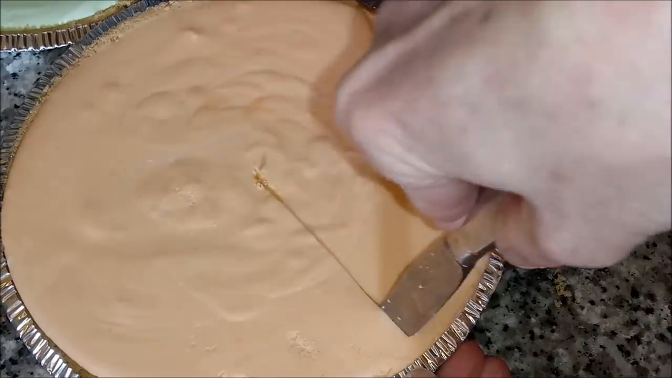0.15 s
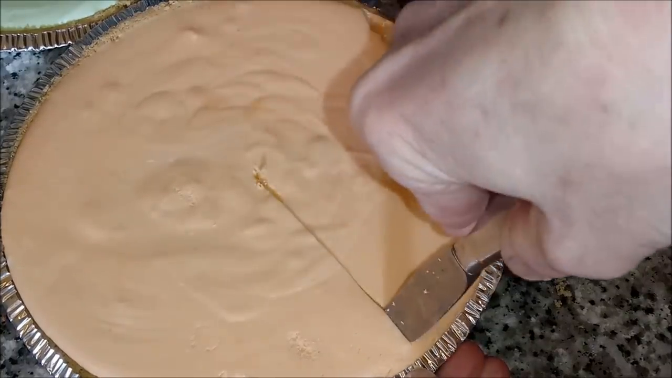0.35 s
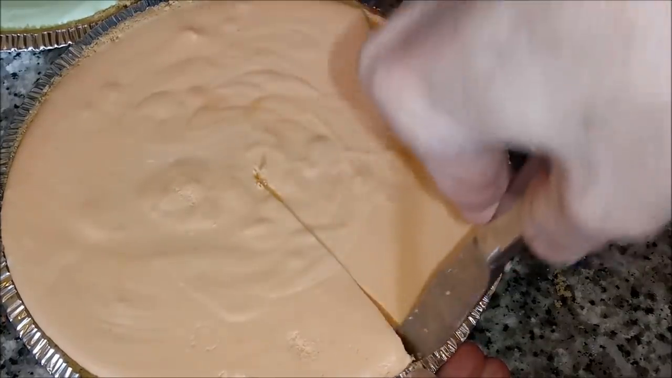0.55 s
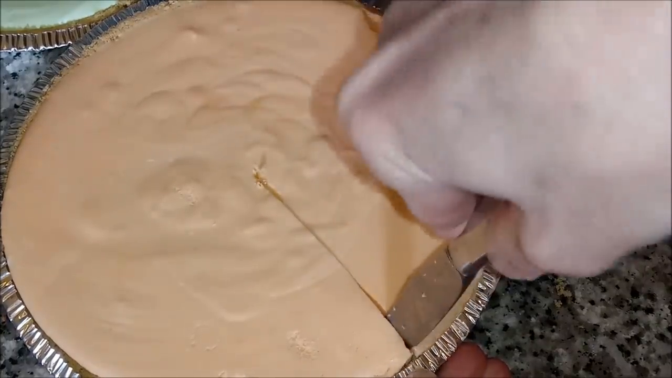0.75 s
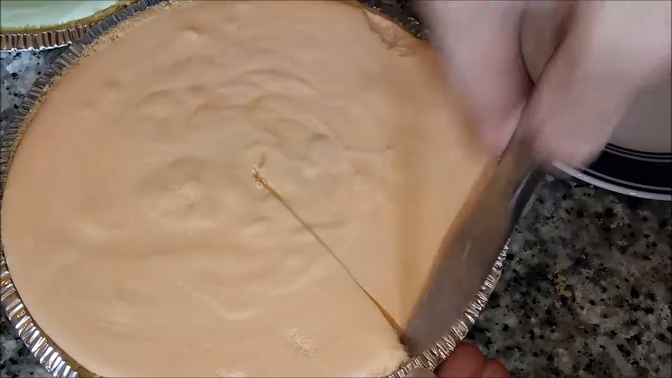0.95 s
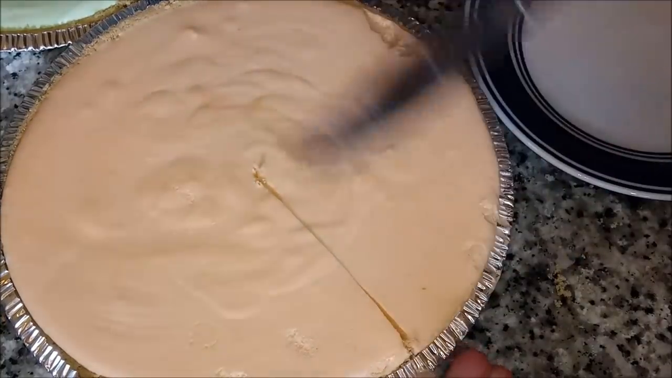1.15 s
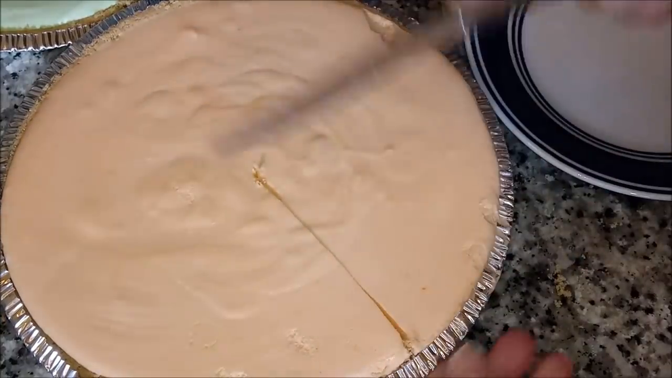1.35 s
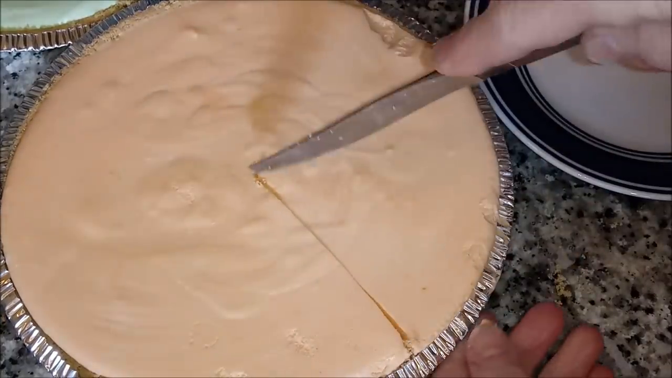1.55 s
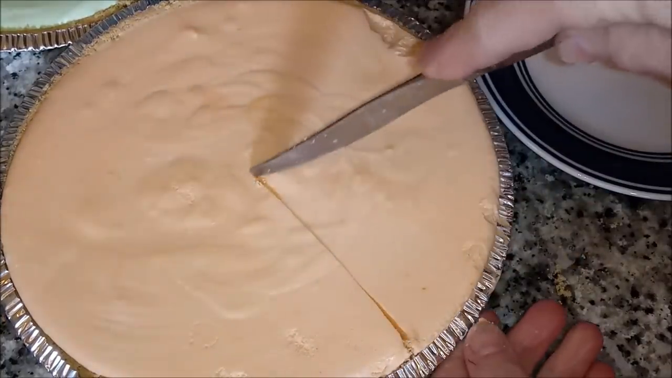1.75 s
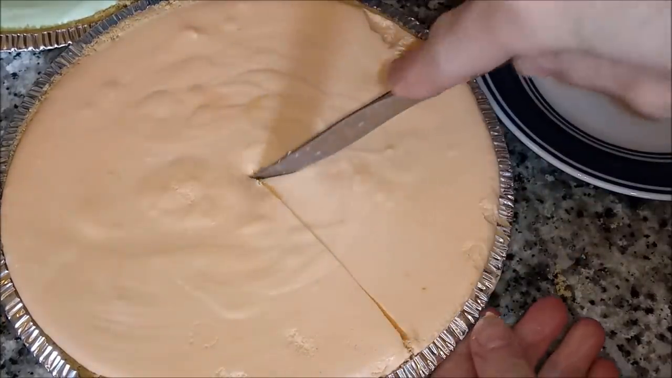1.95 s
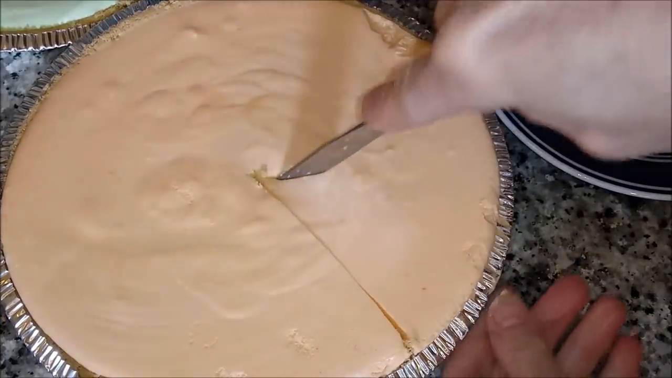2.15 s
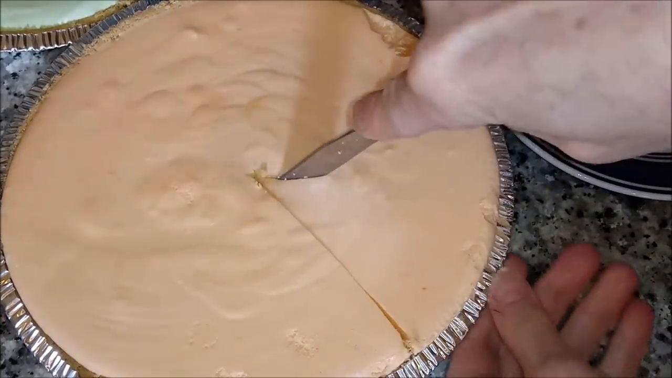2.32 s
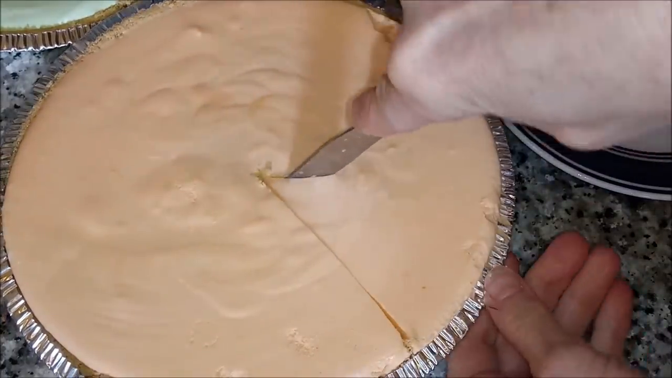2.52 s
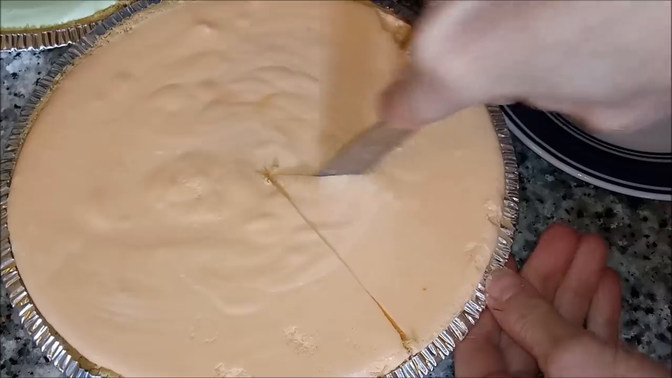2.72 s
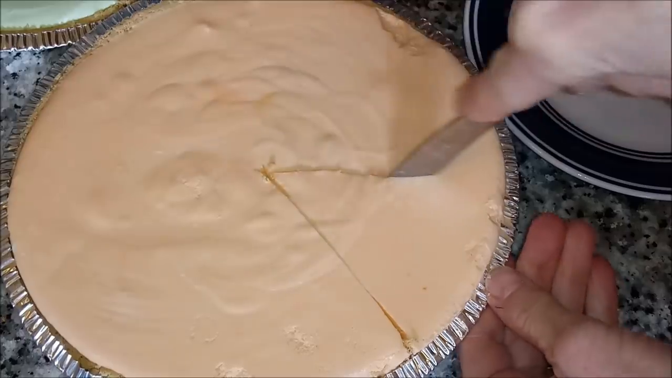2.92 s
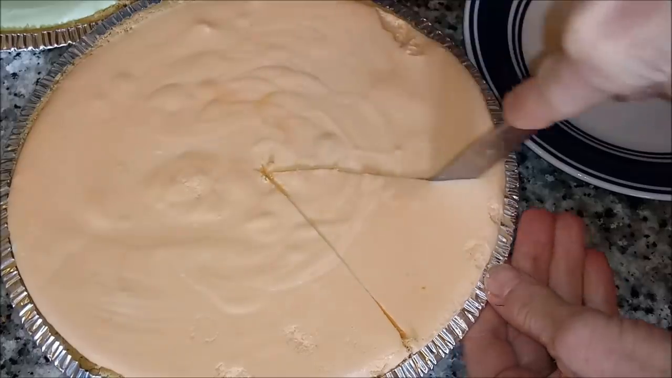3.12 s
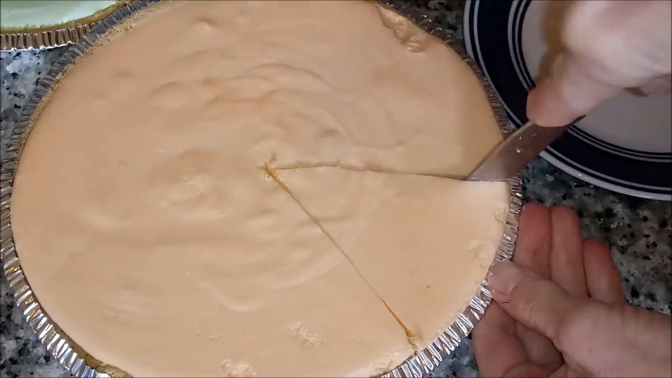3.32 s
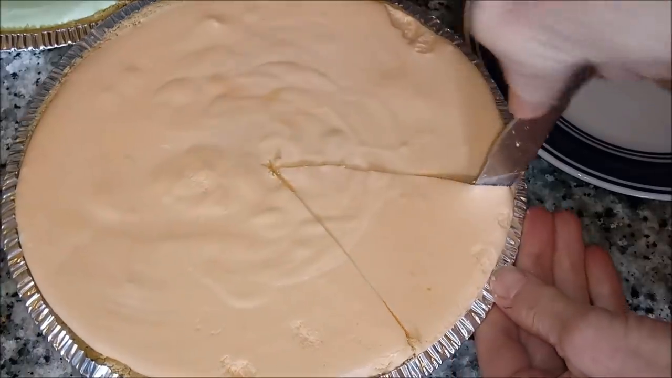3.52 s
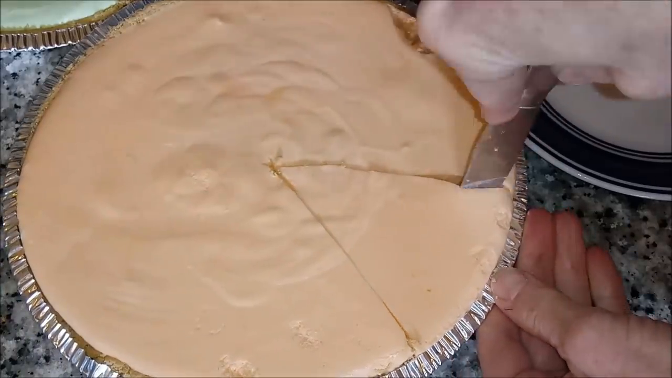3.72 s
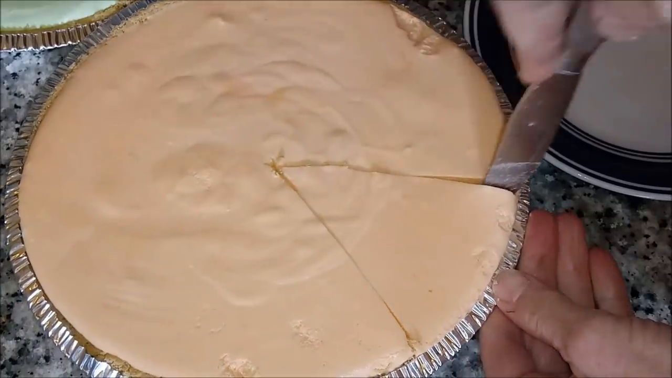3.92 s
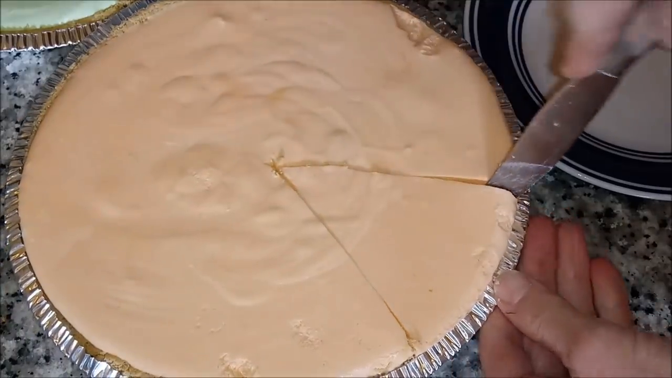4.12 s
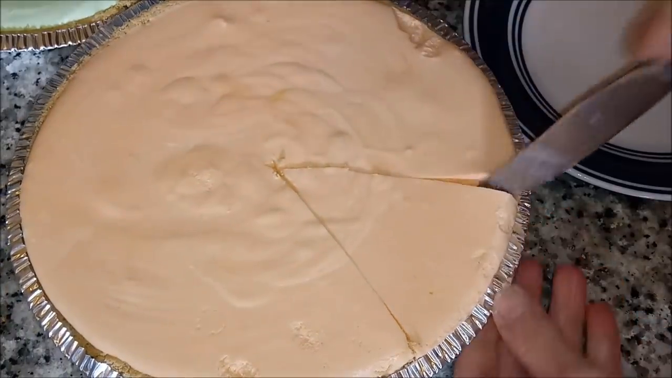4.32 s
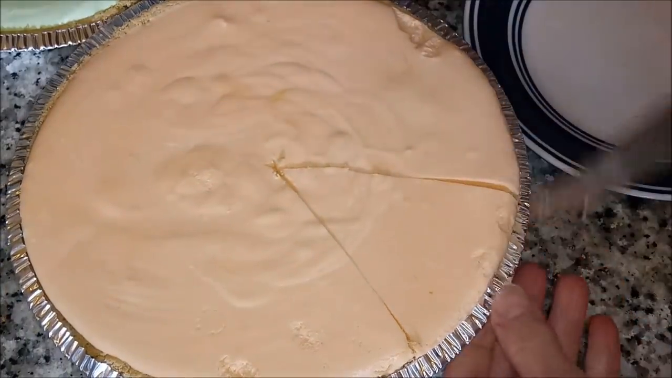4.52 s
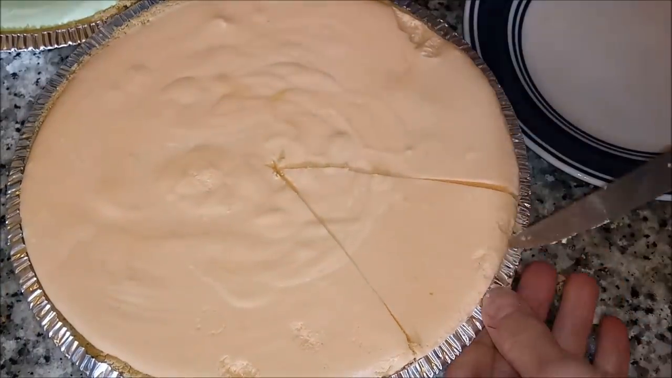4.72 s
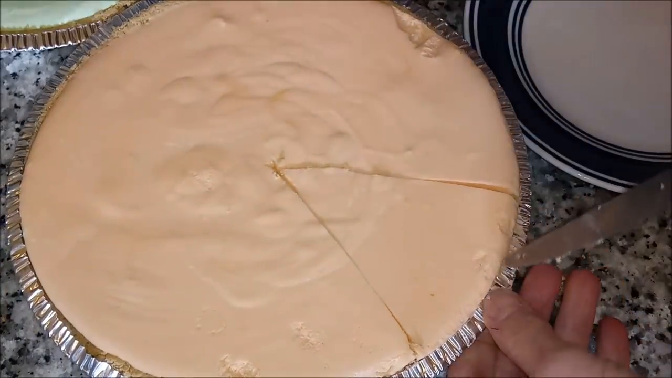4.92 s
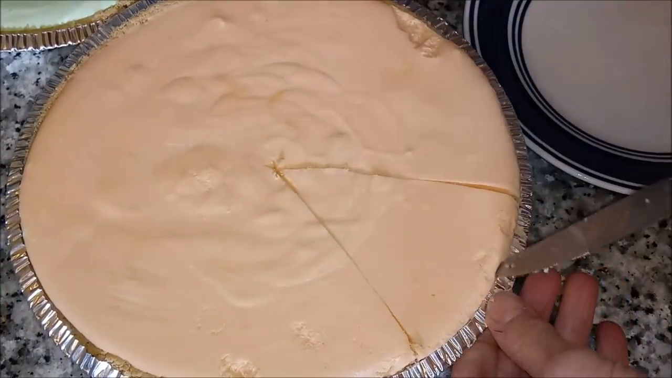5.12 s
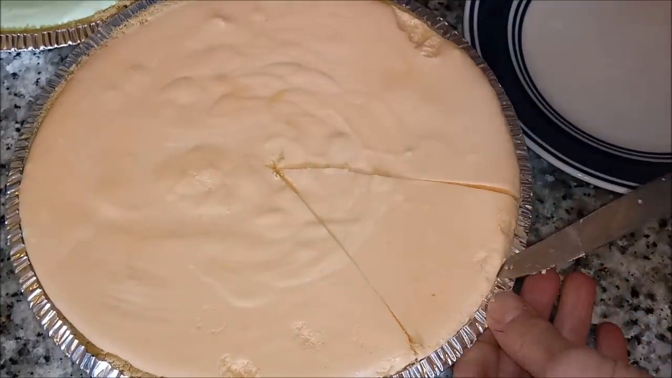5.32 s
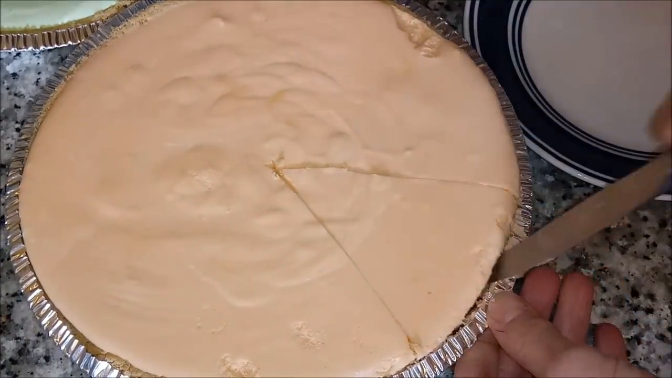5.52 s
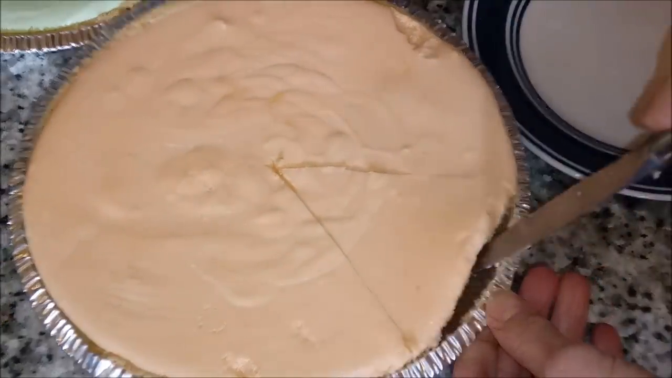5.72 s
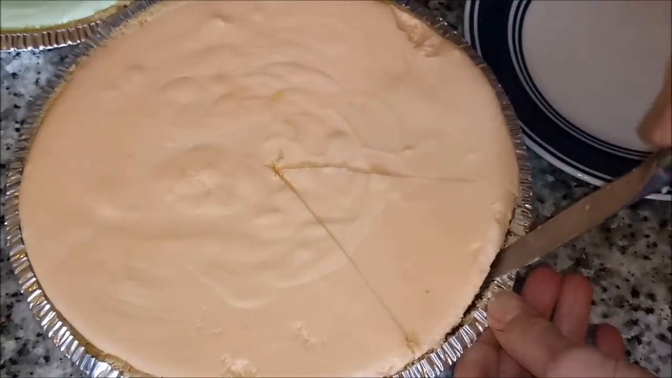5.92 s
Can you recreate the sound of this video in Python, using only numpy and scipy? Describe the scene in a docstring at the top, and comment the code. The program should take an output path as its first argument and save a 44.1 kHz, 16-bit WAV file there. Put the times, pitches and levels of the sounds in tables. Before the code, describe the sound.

Close to the microphone in a small kitchen, a table knife grinds through crumb crust in a foil tin. Foil pops build to one loud snap, then the blade zips over the crimped rim with a quick metallic rattle and short ring. After a quiet pause come gritty scrapes, small crunches and more pops, ending with brighter cracks as the slice is loosened. A faint high chirp repeats over steady low noise and hiss.

```python
"""Kitchen counter: a table knife cuts a cream pie in a foil tin, close to the microphone.
Crumb fractures drive blade and tin as the crust is ground; flexing foil panels pop.
The blade knocks over the pleats of the crimped rim as it is pulled out, then rings; rubs are narrow-band noise.
A hand steadies the tin with soft bumps of low noise; a faint high chirp of swept noise repeats in the room.
Dense reflections and a steady background noise surround it all."""
import sys
import numpy as np
from scipy import signal
from scipy.fft import rfft, irfft
from scipy.io import wavfile

SR = 44100
rng = np.random.default_rng(int(sys.argv[2]) if len(sys.argv) > 2 else 0)


def transcribe(u):
    """Save the signal u as a 16-bit wav file named by the first command-line argument.

    u: samples, shape (n,) or (channels, n), limited to [-1, 1]; the rate is SR.
    q: integer samples, one column per channel.
    """
    v = np.clip(np.atleast_2d(u).T, -1, 1)
    q = np.round(v * 32767).astype(np.int16)
    wavfile.write(sys.argv[1], SR, q)


N = 267113
TIME = np.arange(N) / SR


def gain_of(db):
    """Decibels to amplitude."""
    return 10 ** (np.asarray(db) / 20)


def evened(x):
    """Scales to rms 1."""
    return x / np.sqrt(np.mean(x ** 2) + 1e-20)


def read(points, hz):
    """Reads a table on a log-frequency axis."""
    f, value = np.transpose(points)
    return np.interp(np.log(hz + 1), np.log(f + 1), value)


def add(mix, s, sound):
    """Mixes a sound in at time s."""
    part = mix[max(0, round(s * SR)):][:len(sound)]
    part += sound[:len(part)]


def click(spectrum, size=2048):
    """Minimum-phase click: the tightest causal pulse with this spectrum."""
    hz = abs(np.fft.fftfreq(size, 1 / SR))
    log_gain = np.log(gain_of(read(spectrum, hz)))
    minimum_phase = np.exp(np.conj(signal.hilbert(log_gain)))
    return np.fft.ifft(minimum_phase).real[:size // 2]


def coloured(x, spectrum):
    """Filters x by a spectrum, at rms 1."""
    return evened(signal.oaconvolve(x, click(spectrum))[:len(x)])


def whistle(hz, width_hz):
    """Noise in a narrow resonance that follows the curve hz, at rms 1."""
    r = np.exp(-np.pi * width_hz / SR)
    noise = rng.standard_normal(len(hz)) + 1j * rng.standard_normal(len(hz))
    wander = signal.lfilter([1], np.poly([r, r]), noise)
    carrier = np.exp(2j * np.pi * np.cumsum(hz) / SR)
    return evened((wander * carrier).real)


def modes(table):
    """Ring of a struck object: damped sines."""
    t = TIME[:SR // 2]
    return sum(gain_of(db - 60 * t / t60) * np.sin(2 * np.pi * hz * t) for hz, db, t60 in table)


def through(x, table):
    """x makes an object ring; rms 1."""
    return evened(signal.oaconvolve(x, modes(table))[:N])


# short pushes of the blade: start t/s, length/s, scrape level/dB, swell over the push/dB,
# weight (dull crunch re scrape)/dB, edge (foil hiss re scrape)/dB
PUSHES = [(0.0, 0.046, -74, -4, 4.5, -0.5), (0.084, 0.087, -59.5, 2.5, -3.5, -4),
          (0.304, 0.31, -76.5, 2, -21, 2.5), (0.536, 0.27, -56.5, 6, -12, -1.5),
          (0.861, .08, -65.5, -0.5, -4.5, -12), (0.946, 0.11, -61, 17, -25, -1),
          (1.347, 0.42, -67.5, -10.5, -16, -7.5), (1.99, .26, -81, 7.5, -9, -2),
          (3.764, 0.084, -61, -10.5, 6, -6), (3.874, 0.067, -61.5, 6, -8, -1.5),
          (3.983, 0.29, -71, 2, 1, 1.5), (4.343, 0.41, -65, -10.5, -11, -3.5),
          (4.733, 0.27, -75.5, 10, -10.5, -3.5), (5.065, 0.17, -73, 14.5, -5.5, -4),
          (5.267, 0.23, -58.5, -15.5, -3.5, -1.5), (5.495, 0.266, -62.5, -3, -4.5, 3),
          (5.792, .27, -46.5, -18, -3.5, -4.5)]
# long cut, centre to rim: t/s, scrape level/dB, weight re scrape/dB, edge re scrape/dB
LONG_CUT = [(2.28, -59.5, -6, -7), (2.298, -56.5, -9, -9), (2.368, -64, -6.5, -7.5), (2.852, -59, -9, -2.5),
            (2.992, -66.5, 1, -2), (3.316, -57, -4.5, -6.5), (3.382, -62.5, -3.5, -3.5),
            (3.516, -58.5, -6.5, -4.5), (3.68, -82, -3, 14)]
# pieces of crust giving way: t/s, scrape level/dB, weight re scrape/dB, edge re scrape/dB
CRACKS = [(0.147, -49.5, -3.5, -2.5), (1.385, -56, -41, -7.5), (2.334, -55, -4, -12), (2.45, -57, -4, -3.5),
          (2.518, -54, -4.5, -9), (3.2, -58.5, -5, -1), (3.252, -65, 9, -6), (3.31, -61, -6, 5),
          (3.505, -54, -6, -8), (3.753, -54, -12, -1), (4.207, -51.5, -5, -5), (5.292, -56.5, -7, -5),
          (5.61, -39.5, -12, -5), (5.655, -60.5, 4, 9), (5.795, -61, -1, -4), (5.82, -52, 6.5, 2.5)]
BITE_DB_PER_S, EASE_DB_PER_S = 754, 235  # scrape onset and decay
CRACK_RISE_DB_PER_S, CRACK_FALL_DB_PER_S = 495, 474


def effort():
    """Amplitudes of scrape, crunch, hiss: pushes, long cut and cracks swell and die; powers add."""
    t = TIME[::32]

    def power(start, end, db, weight_db, edge_db, rise=BITE_DB_PER_S, fall=EASE_DB_PER_S):
        """Holds from start to end, with straight dB slopes on either side."""
        db = db - rise * np.maximum(start - t, 0) - fall * np.maximum(t - end, 0)
        return gain_of([db, db + weight_db, db + edge_db]) ** 2

    s, *columns = np.transpose(LONG_CUT)
    total = power(s[0], s[-1], *(np.interp(t, s, c) for c in columns))
    for start, length, db, swell_db, weight_db, edge_db in PUSHES:
        swelling_db = db + swell_db * np.clip((t - start) / length, 0, 1)
        total += power(start, start + length, swelling_db, weight_db, edge_db)
    for at, *levels in CRACKS:
        total += power(at, at, *levels, CRACK_RISE_DB_PER_S, CRACK_FALL_DB_PER_S)
    return [np.interp(TIME, t, part) for part in np.sqrt(total)]


def crumbs(per_s, spread_db, smooth):
    """Tiny fractures of uneven size over smooth friction noise."""
    size = gain_of(spread_db * np.minimum(rng.exponential(1, N), 4))
    breaks = size * rng.choice([-1, 1], N) * (rng.random(N) < per_s / SR)
    return evened(evened(breaks) + smooth * rng.standard_normal(N))


def squelches(per_s, cycles, spread_db, count=18):
    """Tiny air pockets in the moist filling burst, each a short tone of slightly rising pitch."""
    out = np.zeros(N)
    for hz in np.geomspace(850, 2300, count):
        u = TIME[:int(4 * cycles / hz * SR)] * hz / cycles
        size = gain_of(spread_db * np.minimum(rng.exponential(1, N), 3))
        bursts = size * (rng.random(N) < per_s / count / SR)
        bubble = u * np.exp(-2 * u) * np.sin(2 * np.pi * cycles * u * (1 + 0.036 * u))
        out += signal.oaconvolve(bursts, bubble)[:N]
    return evened(out)


def flutter(depth_db, slowest_hz, fastest_hz):
    """The blade catches and gives way at random: a wavering gain."""
    t = TIME[::64]
    rates_hz = np.geomspace(slowest_hz, fastest_hz, 24)
    waver = sum(np.sin(2 * np.pi * (hz * t + rng.random())) for hz in rates_hz)
    return gain_of(depth_db * np.interp(TIME, t, evened(waver)))


# filters for the stroke's three parts: f/Hz, level/dB
SCRAPE_SPECTRUM = [(400, -31.5), (700, -33.5), (1000, -1), (1300, -0.5), (1750, 6.5), (2300, 0),
                   (2800, -3.5), (3600, -3), (5000, -45.5)]
CRUNCH_SPECTRUM = [(40, -19.5), (100, -2.5), (200, -16), (400, 2), (650, 1), (900, 14), (1200, 0),
                   (2000, -42.5)]
HISS_SPECTRUM = [(600, -18), (2200, -6), (3000, 2), (4000, 0), (5500, 3), (6500, 2), (7200, -10.5),
                 (8200, -24.5), (11000, -30), (15000, -43.5)]
# steel blade modes, also rung by rim(): f/Hz, level/dB, t60/s
BLADE = [(1447, 6.5, 0.53), (1545, 0.5, 0.33), (1900, -1, .25), (1911, -17.5, 0.45), (1985, -6, .2),
         (2520, -7, .2), (3400, 4.5, .13), (4690, -19.5, .15), (5870, -11.5, .16), (6630, -0.5, .2)]
# resonances of the filled tin on the counter: f/Hz, level/dB, t60/s
TIN = [(103, 2.5, 0.32), (280.4, -4, 0.45), (372.6, -5, 0.84), (480, -2.5, 0.2), (690, -4.5, 0.39),
       (785.4, 6.5, 0.045), (954, -9, 0.018), (1308, 9, 0.43)]


def cutting():
    """Crumb fractures drive blade and tin; pressure adds dull crunch, the edge on bare foil hiss."""
    scraping, weight, edge = effort()
    fine = crumbs(per_s=1000, spread_db=3.5, smooth=.5)
    coarse = crumbs(per_s=70, spread_db=1.5, smooth=0)
    grit = evened(fine + .45 * coarse)
    scrape = coloured(grit, SCRAPE_SPECTRUM)
    moist = squelches(per_s=160, cycles=9, spread_db=3.5)
    scrape = evened(scrape + gain_of(-12.5) * through(scrape, BLADE) + .5 * moist)
    crunch = coloured(crumbs(per_s=300, spread_db=-1.0, smooth=0.27), CRUNCH_SPECTRUM)
    crunch = evened(crunch + gain_of(-1.5) * through(crunch, TIN))
    hiss = coloured(grit + crumbs(per_s=2400, spread_db=-2.0, smooth=1.0), HISS_SPECTRUM)
    body = gain_of(0.9) * scraping * scrape + gain_of(0.4) * weight * crunch
    catch = flutter(depth_db=1.2, slowest_hz=12, fastest_hz=70)
    return catch * (body + edge * hiss)


HAND_DB, HAND_DELAY_S, HAND_SWAY_S, HAND_SWAY_HZ = -10, .003, .0005, .4  # mean delay, its sway and rate


def under_hand(x):
    """One close reflection from the moving hand combs the sound with slowly shifting ripples."""
    delay_s = HAND_DELAY_S + HAND_SWAY_S * np.sin(2 * np.pi * HAND_SWAY_HZ * TIME)
    echo = gain_of(HAND_DB)
    return (x + echo * np.interp(TIME - delay_s, TIME, x)) / np.hypot(1, echo)


# steady background noise with a faint high hiss: f/Hz, level/dB
BACKGROUND_SPECTRUM = [(25, -13), (60, -6), (100, 0.5), (200, -3.5), (500, -6.5), (1000, -12.5), (1600, 1),
                       (3000, -9.5), (5500, -2.5), (7000, -16), (8200, -25.5), (13500, -23), (15200, -13),
                       (15800, -24), (16100, -23)]


def background():
    """Steady background noise: white noise through one fixed filter."""
    return gain_of(-73.5) * coloured(rng.standard_normal(N), BACKGROUND_SPECTRUM)


CHIRP_FIRST_S, CHIRP_CYCLE_S, CHIRP_SECOND_S = .021, .5514, .295  # two per cycle, unevenly spaced
CHIRP_DB, CHIRP_LENGTH_S = -59.5, .036


def chirps():
    """Short, fuzzy rising noise sweeps with a quick start, in a steady limping rhythm."""
    out, u = np.zeros(N), np.linspace(0, 1, int(CHIRP_LENGTH_S * SR))
    shape = np.sin(np.pi * u ** .65) ** 2
    for cycle in np.arange(CHIRP_FIRST_S, N / SR, CHIRP_CYCLE_S):
        for s in (cycle, cycle + CHIRP_SECOND_S):
            tone = whistle(4800 + 750 * u, width_hz=550)
            add(out, s, gain_of(CHIRP_DB) * shape * tone)
    return out


# stick-slip rubs of blade on crust and foil; the two narrowest rows (1.359 s, 2.113 s) are faint rings near 1.3
# kHz: t/s, level/dB, length/s, starting f/Hz, width/Hz
SQUEALS = [(.076, -52, 0.06, 751, 300), (0.133, -47.5, 0.038, 665, 288), (0.324, -67.5, .14, 1557, 293),
           (1.359, -70, 0.35, 1284, 50.1), (1.98, -73, .13, 1915, 200), (2.113, -71, 0.23, 1240, 50.5),
           (2.236, -55, 0.015, 1630, 150), (2.887, -60.5, 0.19, 944, 397), (3.181, -55, 0.088, 822, 576),
           (3.285, -50, 0.053, 914, 670), (3.369, -56.5, 0.16, 4310, 1110), (3.546, -56.5, 0.17, 1101, 500),
           (4.742, -67.5, 0.059, 1720, 297), (4.857, -63.5, 0.178, 3070, 506),
           (5.116, -70, 0.055, 1600, 395), (5.781, -46, 0.072, 1724, 680)]
SQUEAL_SAG = 0.0284  # share of pitch lost as the blade slows


def squeals():
    """Fast stick and slip gives a fuzzy tone that sags and fades; the narrowest rows sound as faint, nearly
    pure rings."""
    out = np.zeros(N)
    for s, db, length, hz, width_hz in SQUEALS:
        u = np.linspace(0, 1, int(length * SR))
        shape = signal.windows.tukey(len(u), .2) * gain_of(-6 * u)
        add(out, s, gain_of(db) * shape * whistle(hz * (1 - SQUEAL_SAG * u), width_hz))
    return out


# sharp snap of creasing foil: f/Hz, level/dB
SNAP_SPECTRUM = [(300, -49), (900, -41), (2000, -12.5), (3000, 0.5), (4200, 2.5), (5500, 4.5), (6600, 3.5),
                 (7600, -9.5), (10000, -21), (13000, -24.5), (16000, -18.5)]
# modes of a flexing foil panel: multiple of panel pitch, level/dB
PANEL = [(.72, -8), (1, 7.5), (1.621, 4), (2.05, 4)]


def pop(hz, t60, bright_db, fizz_hz, crinkle_db):
    """A foil panel flips: a snap, a brief crinkle, and a few heavily damped panel modes."""
    lowpass = signal.butter(4, min(fizz_hz, .45 * SR), fs=SR, output="sos")
    snap = signal.sosfilt(lowpass, click(SNAP_SPECTRUM))
    snap = snap / abs(snap).max()
    t = TIME[:len(snap)]
    crinkle = gain_of(-60 * t / 0.027) * rng.standard_normal(len(t)) * (t > .0006)
    crinkle = crinkle / np.linalg.norm(crinkle)
    snap = snap + gain_of(crinkle_db) * np.convolve(snap, crinkle)[:len(t)]
    flex = sum(gain_of(db) * np.sin(2 * np.pi * hz * ratio * t) for ratio, db in PANEL)
    # slow bending waves arrive after the snap
    radiated = signal.butter(4, [min(0.64 * hz, 1500), 2350], "band", fs=SR, output="sos")
    panel = signal.sosfilt(radiated, flex * gain_of(-60 * t / t60))
    return panel / abs(panel).max() + gain_of(bright_db) * snap


# pops of foil under the blade: t/s, level/dB, panel f/Hz, brightness (snap re panel)/dB
POPS = [(.1500, -34, 1450, 4.5), (0.17, -37.5, 894, -2.5), (0.397, -49.5, 1750, 8.5), (.554, -39, 1500, -1),
        (.6710, -31, 1240, 2.5), (.6857, -15.5, 1590, 6), (0.7631, -26.5, 1300, -4),
        (.839, -28.5, 1780, -8), (.842, -33.5, 1330, -1.5), (2.726, -43.5, 1460, 3.5),
        (2.896, -42.5, 1150, -5), (3.022, -42, 855, -5), (3.1975, -39.5, 980, -11),
        (3.5017, -41.5, 1010, 1.5), (3.5464, -39, 1250, 4.5), (3.7647, -29.5, 1120, -4.5),
        (4.211, -40, 1850, 8), (4.318, -51.5, 1820, 12.5), (4.387, -47, 1540, 0), (4.8498, -55, 1470, 15.5),
        (5.2129, -26.5, 983, -2.5), (5.498, -42.5, 1030, 1), (5.521, -30, 1045, -10.5),
        (5.6018, -28, 1610, -1), (5.619, -38, 1080, 6), (6.0047, -32.5, 1910, 6.5)]
PANEL_T60_S, PANEL_DAMPING = .013, 2.5  # t60 at 1 kHz; falls with this power of pitch


def foil():
    """Pops as the blade presses the tin; high panels die sooner, harder snaps fizz higher."""
    out = np.zeros(N)
    for s, db, hz, bright_db in POPS:
        t60 = PANEL_T60_S * (1000 / hz) ** PANEL_DAMPING
        fizz_hz = 19000 * gain_of(.18 * (db + bright_db))
        add(out, s, gain_of(db) * pop(hz, t60, bright_db, fizz_hz, crinkle_db=-4.5))
    return out


# tin shifts under the steadying hand: t/s, level/dB, time scale/s, rumble centre f/Hz
BUMPS = [(0.827, -65, 0.098, 201), (1.032, -63, 0.1, 445), (1.9, -83, 0.13, 126), (2.258, -71.5, 0.16, 95),
         (2.356, -69.5, 0.35, 297), (3.769, -51, 0.0098, 410), (3.775, -68, .07, 149),
         (4.068, -61, 0.078, 464), (4.171, -59.5, 0.017, 407), (4.489, -66, 0.18, 110),
         (4.856, -56.5, 0.085, 49), (4.875, -59.5, 0.12, 265), (5.211, -61, 0.14, 131),
         (5.556, -63, 0.066, 243), (5.8, -63.5, 0.25, 77.5), (5.865, -55.5, 0.081, 260)]


def bumps():
    """Soft low rumbles that swell quickly and die away."""
    out = np.zeros(N)
    for s, db, length, hz in BUMPS:
        u = np.arange(int(2 * length * SR)) / (length * SR)
        band = signal.butter(2, [.5 * hz, 1.5 * hz], "band", fs=SR, output="sos")
        rumble = evened(signal.sosfilt(band, rng.standard_normal(len(u))))
        swell = (u / 0.21) * np.exp(1 - u / 0.26)
        add(out, s, gain_of(db) * rumble * swell)
    return out


def dispersed(x, lag_s):
    """Bending waves in foil: low pitches travel slowly and arrive late (lag_s at 1 kHz)."""
    hz = np.fft.rfftfreq(len(x), 1 / SR)
    return irfft(rfft(x) * np.exp(-4j * np.pi * lag_s * np.sqrt(1000 * hz)), len(x))


# blade jumps from pleat to pleat of the rim: t/s, relative level/dB
PLEATS = [(1.0236, -34), (1.0259, -20), (1.0300, -16), (1.0342, -17), (1.0376, -10), (1.0410, -9),
          (1.0432, -11), (1.0453, -13), (1.0484, -11), (1.0508, -11), (1.0534, -20), (1.0601, -24)]
# knock of one stiff pleat on the blade: f/Hz, level/dB
KNOCK_SPECTRUM = [(200, -41.5), (400, -27.5), (650, -22), (900, -14.5), (1100, -7), (1350, -4.5),
                  (1750, 1.5), (2200, -3.5), (2900, -11.5), (4000, -12.5), (6300, -13.5), (7600, -32),
                  (10500, -36), (15500, -37.5)]


def rim():
    """Each pleat knocks and crinkles on the blade, which rings freely from the last one."""
    out = np.zeros(N)
    knock = dispersed(click(KNOCK_SPECTRUM), lag_s=.0005)
    knock = knock / abs(knock).max()
    t = TIME[:len(knock)]
    for s, db in PLEATS:
        crinkle = gain_of(-60 * t / .016) * rng.standard_normal(len(t)) * (t > .0008)
        crinkle = crinkle / np.linalg.norm(crinkle)
        crinkle = gain_of(-11) * np.convolve(knock, crinkle)[:len(t)]
        add(out, s, gain_of(db - 0.2) * (knock + crinkle))
    add(out, PLEATS[-1][0], gain_of(-55.5) * modes(BLADE))
    return out


# decay of the kitchen: f/Hz, t60/s
KITCHEN_T60 = [(200, .45), (700, .34), (1700, .4), (4500, .37), (6800, .35), (8500, .22), (13000, .14)]


def kitchen(x):
    """Dense reflections off counter and walls, each band dying at its own speed."""
    taps = rng.choice([-1., 1.], SR) * (rng.random(SR) < 5000 / SR)
    hz, t, z = signal.stft(taps, SR, nperseg=256)
    # f/Hz, level/dB
    colour = [(200, -12), (800, 0.5), (1700, -1.0), (3200, -2.5), (6200, -3), (9000, 5), (15000, 1.5)]
    colour_db = read(colour, hz)[:, None]
    decay_db = -60 * t / read(KITCHEN_T60, hz)[:, None]
    tail = signal.istft(z * gain_of(colour_db + decay_db), SR, nperseg=256)[1][:SR]
    t = TIME[:SR]
    tail *= np.clip(t / 0.009 - .5, 0, 1) * (1 + 6.2 * np.exp(-t / 0.0076))  # near surfaces answer first
    return signal.fftconvolve(x, tail / np.linalg.norm(tail))[:N]


def scene():
    """Everything at the counter, with the room around it."""
    cut = under_hand(cutting()) + squeals()
    chirp, pops, rasp = chirps(), foil(), rim()
    sends = gain_of(-11) * cut + gain_of(-13.5) * pops + gain_of(-10.5) * rasp + gain_of(-5) * chirp
    return (cut + chirp + pops + bumps() + rasp + kitchen(sends) + background())[None]


EDGE_HZ = 16300


def record(dry):
    """A high-pass removes the deepest bass; a linear-phase low-pass limits the treble at EDGE_HZ."""
    thin = signal.sosfilt(signal.butter(3, 36, "high", fs=SR, output="sos"), dry)
    lowpass = signal.firwin(511, EDGE_HZ, window=("kaiser", 9), fs=SR)
    return signal.oaconvolve(thin, lowpass[None], "same")


dry = scene()
out = record(dry)
transcribe(out)
```